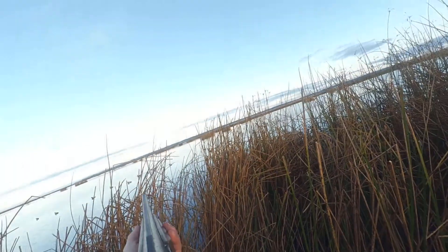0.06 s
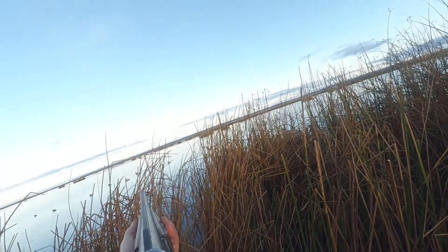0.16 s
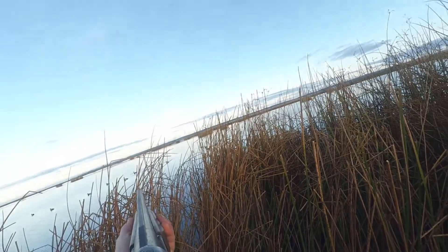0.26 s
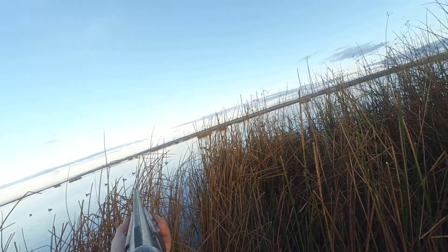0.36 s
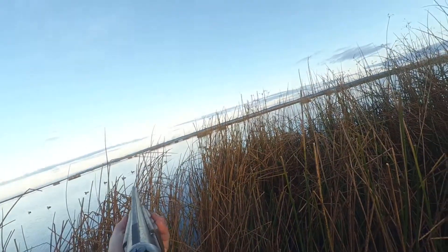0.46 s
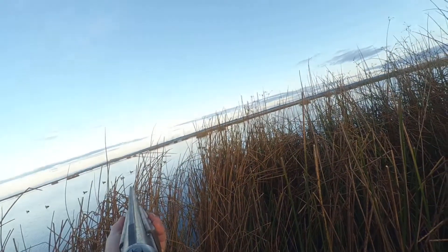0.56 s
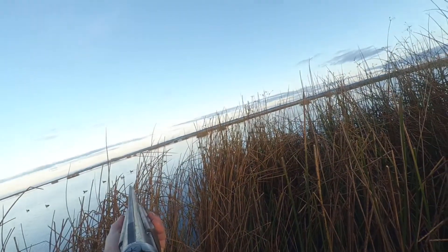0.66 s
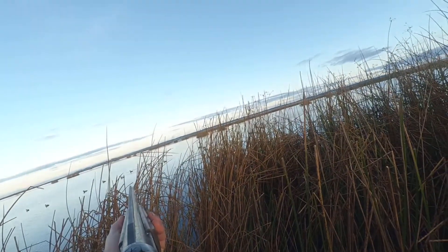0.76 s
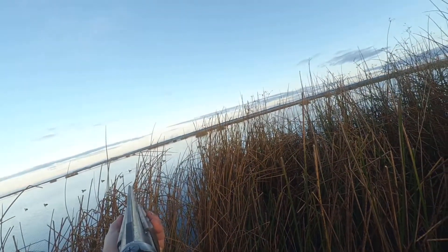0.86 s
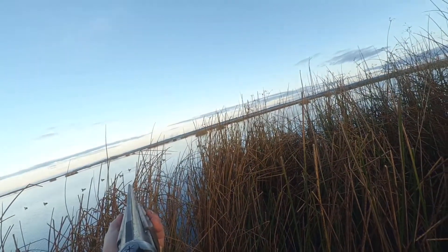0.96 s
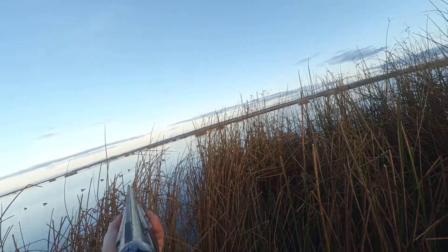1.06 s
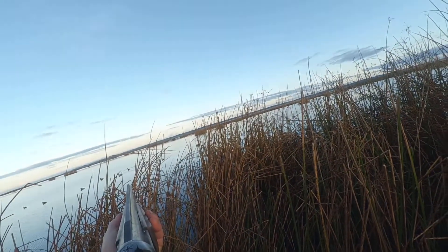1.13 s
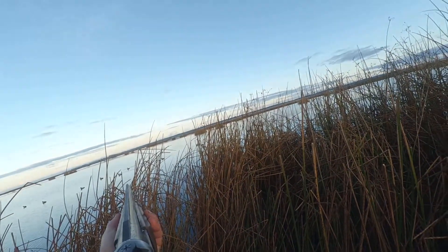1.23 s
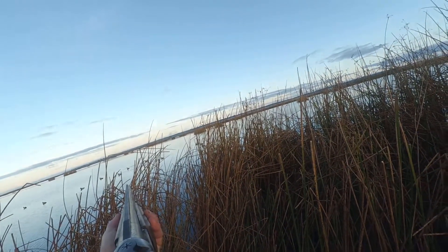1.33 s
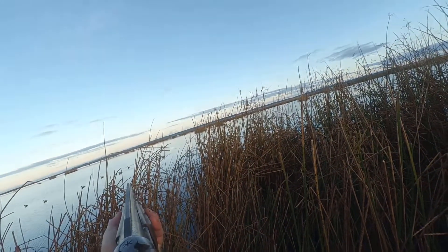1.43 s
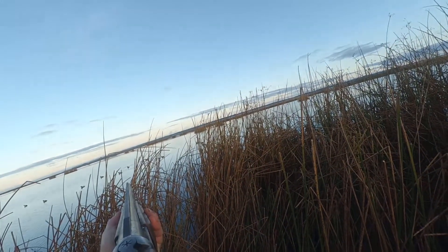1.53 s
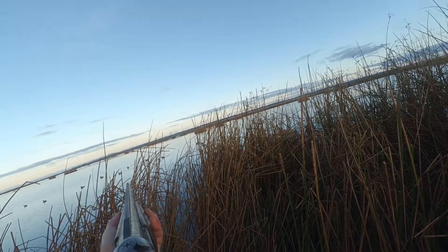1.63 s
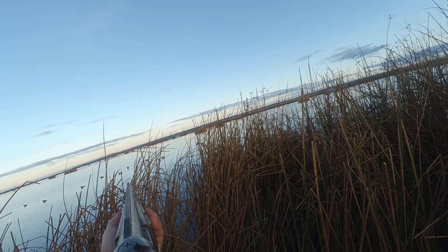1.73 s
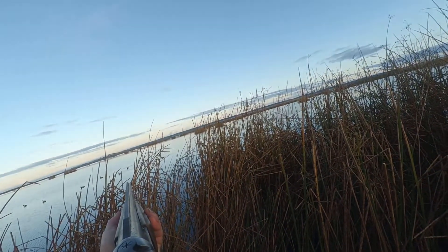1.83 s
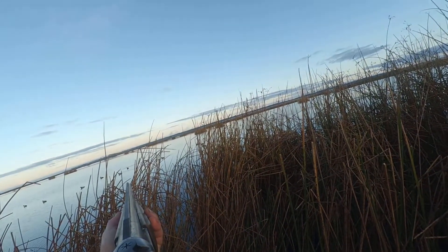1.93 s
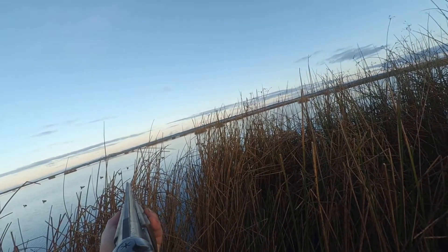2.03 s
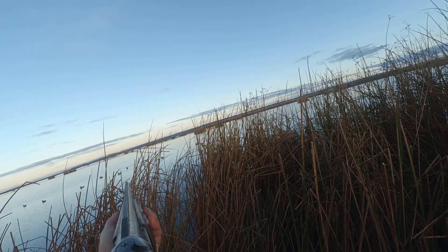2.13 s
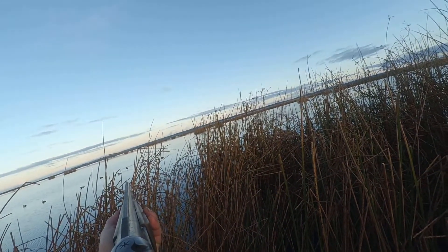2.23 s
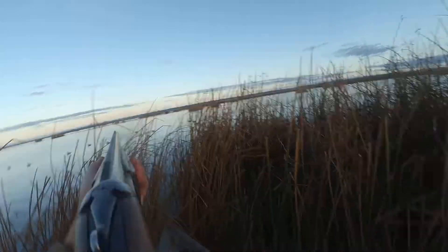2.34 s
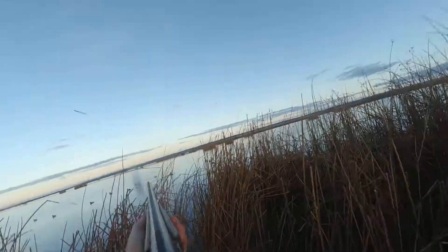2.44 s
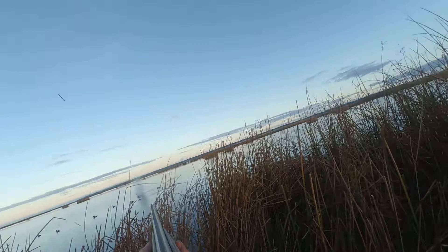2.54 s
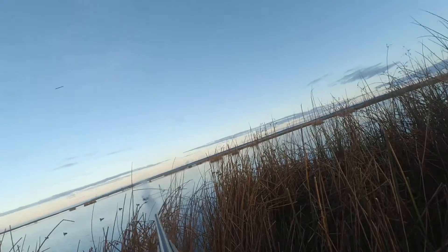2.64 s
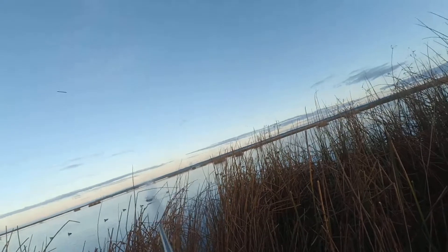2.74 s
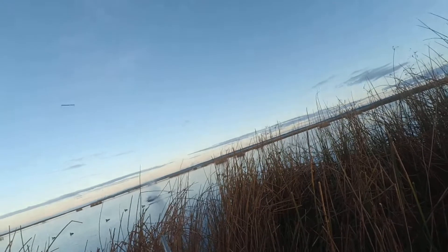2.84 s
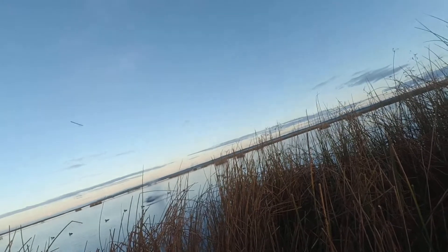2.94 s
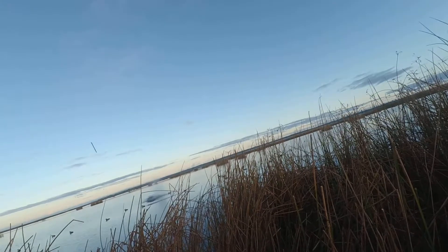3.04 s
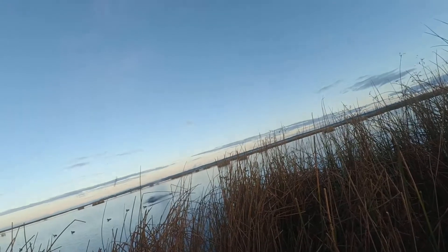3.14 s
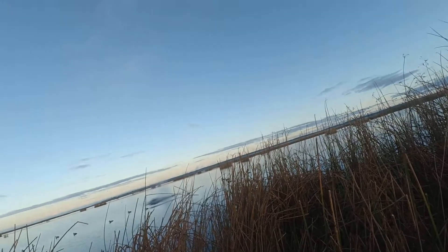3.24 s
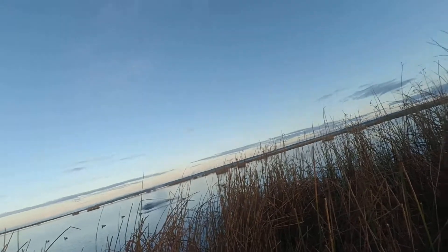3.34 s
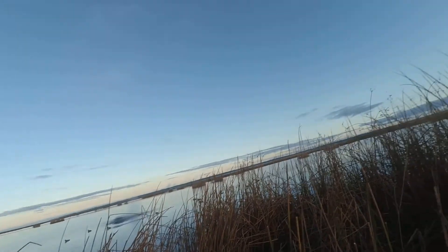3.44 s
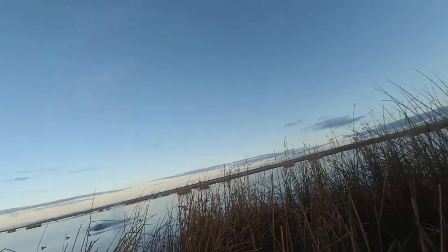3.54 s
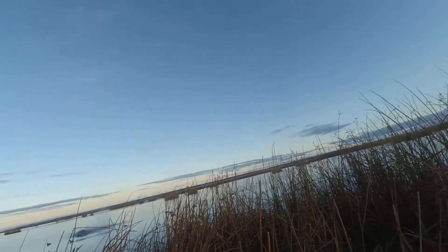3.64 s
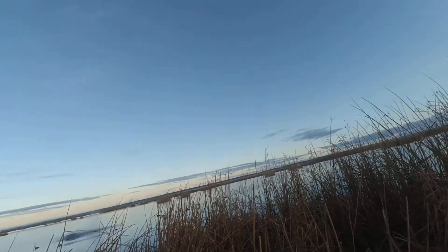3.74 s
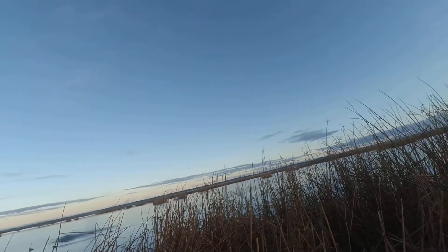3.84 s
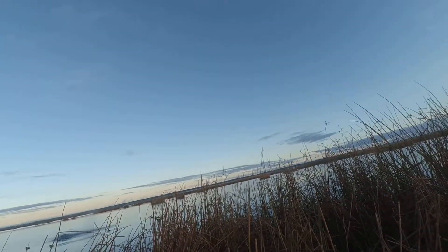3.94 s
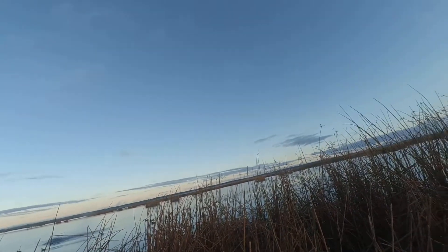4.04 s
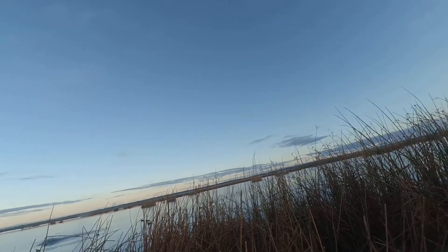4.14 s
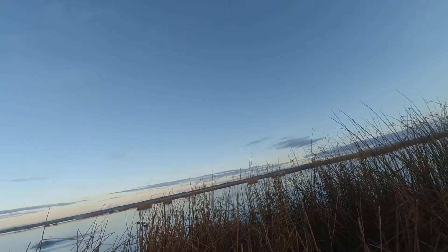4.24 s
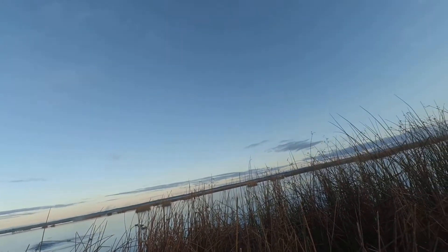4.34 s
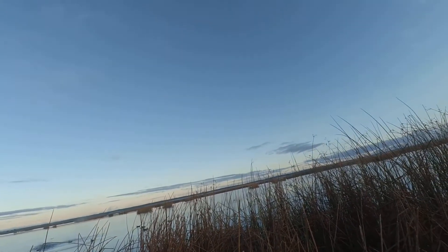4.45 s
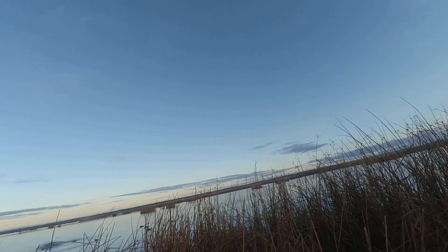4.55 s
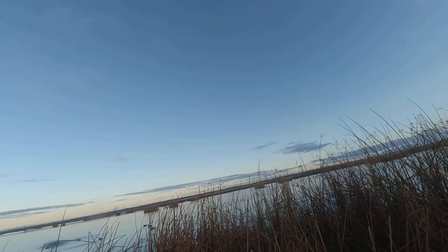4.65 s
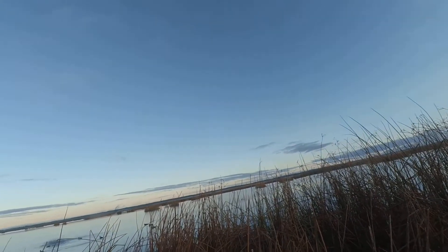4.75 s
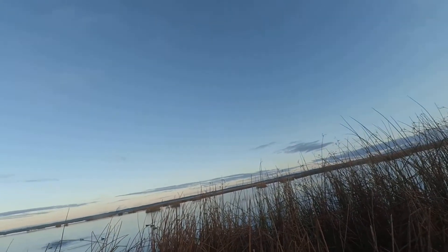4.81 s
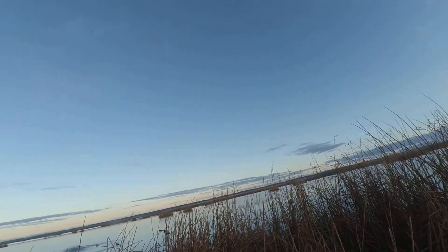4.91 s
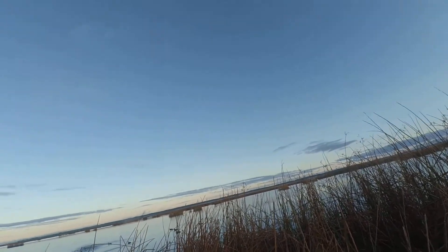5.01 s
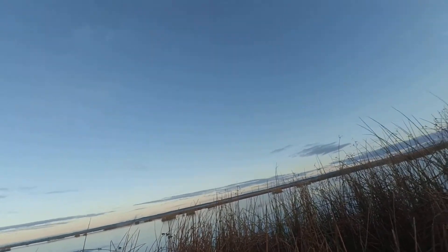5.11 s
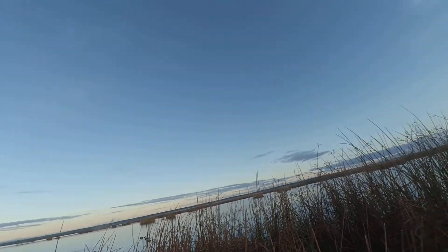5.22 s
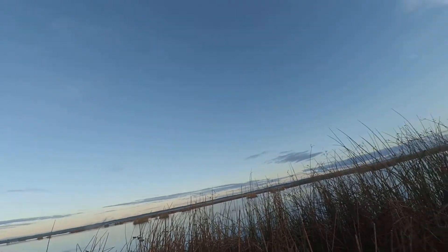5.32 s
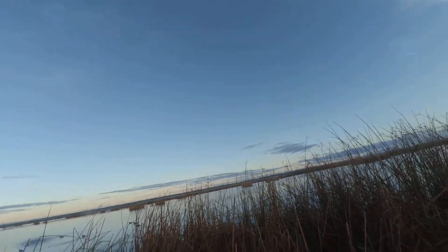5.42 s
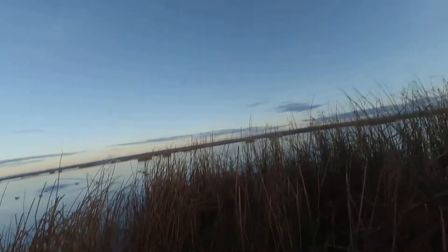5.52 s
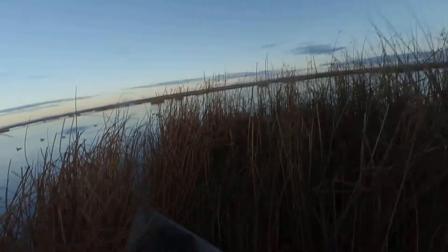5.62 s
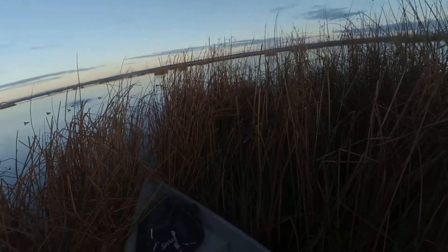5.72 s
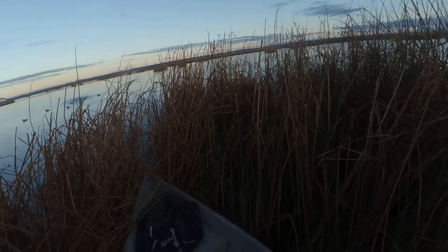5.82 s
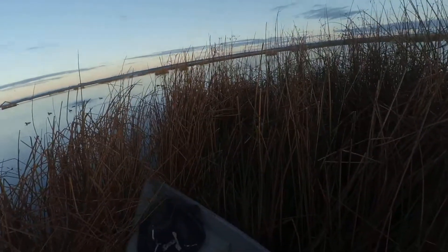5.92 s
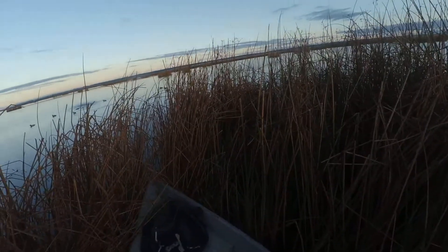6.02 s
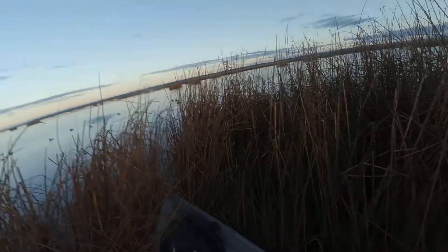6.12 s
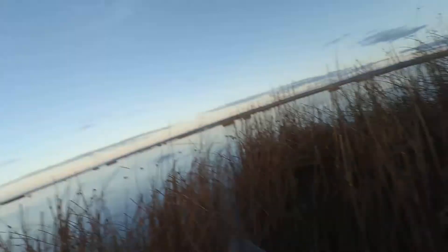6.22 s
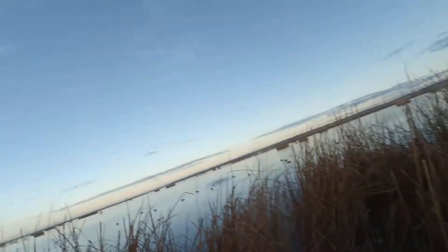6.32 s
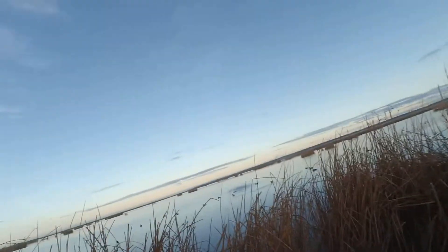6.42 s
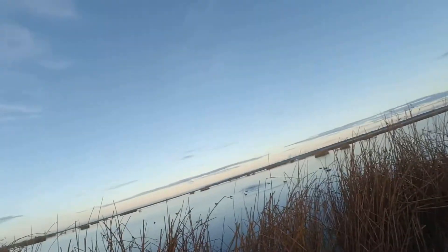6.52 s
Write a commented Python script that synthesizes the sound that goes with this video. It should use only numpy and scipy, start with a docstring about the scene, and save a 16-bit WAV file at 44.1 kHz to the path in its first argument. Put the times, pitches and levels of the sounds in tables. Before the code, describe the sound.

Light wind in a reed bed, then a single distorted shotgun shot with a fading echo, small clicks and dry snaps.

```python
"""A self-loading shotgun in a reed bed, heard at a head-worn camera.
First a far steady rush, light wind on the microphone, a rustle and a few dry snaps. At 2.06 s the gun
fires once and overloads the microphone; the bolt slams back and forward, the spent shell lands.
The marsh echoes until about 4.2 s while falling bits tick on the stems. Small steel clicks, snaps,
rustles and bumps on the camera go on to the end."""
import sys
import numpy as np
from scipy import signal
from scipy.fft import rfft, irfft, next_fast_len
from scipy.io import wavfile
from scipy.ndimage import map_coordinates

SR = 44100
rng = np.random.default_rng(int(sys.argv[2]) if len(sys.argv) > 2 else 0)


def wav_out(sig):
    """Save sig, one row per channel (or a flat mono array), as 16-bit PCM at SR to the path in sys.argv[1]."""
    wavfile.write(sys.argv[1], SR, np.round(np.clip(np.atleast_2d(sig).T, -1, 1) * 32767).astype(np.int16))


N = 289869

# noise spectra: (frequency [Hz], relative density [dB])
FAR_SPECTRUM = [(53, -33), (90, -4), (130, -3), (161, -5), (222, -7), (334, -12), (371, -12.5),
                (513, -15.5), (822, -9.5), (1020, -12), (2210, -39), (3950, -38), (6470, -40),
                (13400, -44.5), (15300, -44.5)]  # far rush and microphone hiss
WIND_SPECTRUM = [(4.7, -29), (8.0, 6), (54, 2.5), (62, 0.5), (81, -10), (120, -14.5), (160, -42),
                 (260, -120)]
STEM_SPECTRUM = [(880, -30), (1500, 5.5), (2530, -2.5), (2740, -3.5), (5000, 4.5), (5460, -6), (8450, -3.5),
                 (15300, -40)]
SHELL_SPECTRUM = [(210, -39.5), (350, -16), (488, -0.5), (599, -10), (1040, -3), (1730, -9), (1990, 1),
                  (2600, -21), (2820, -14), (6210, -9.5), (15300, -36)]
ECHO_BODY_SPECTRUM = [(180, -17.5), (300, 0.5), (393, -6.5), (492, -3), (1010, 1), (1120, -2),
                      (4290, -13.5), (5000, -22.5), (6500, -46.5), (11000, -120)]
ECHO_HISS_SPECTRUM = [(2350, -37), (4000, -3.5), (5010, -7), (7710, -5), (10400, -15), (13500, -17),
                      (15300, -30.5)]
BLAST_SPECTRUM = [(180, -34), (300, -3.5), (1300, -13), (2090, -8.5), (3590, -7.5), (4100, -7.5),
                  (5160, -7), (5420, -9), (7410, -4), (11500, -12.5), (15300, -20.5)]  # gas and pellets
# resonances: (frequency [Hz], width [Hz], gain [dB])
FITTING_MODES = [(1700, 320, 0), (2840, 68, 0), (3800, 160, -16), (5000, 180, -8), (5580, 440, 0),
                 (7700, 270, 11), (13400, 460, 6)]  # small steel parts
STEEL_MODES = [(2120, 730, -2), (3715, 810, 1.5), (4340, 440, 2), (5600, 1000, -7), (7610, 1100, -7),
               (11660, 3000, -24)]  # receiver and bolt
CLANK_MODES = [(590, 350, 0.5), (1450, 250, -2.5)]  # stock and barrel
# click bands, low to high: (frequency [Hz], width [Hz])
CLICK_BANDS = [(1300, 1400), (2600, 2220), (4700, 3400), (7600, 3100), (12500, 3900)]
# wind on the microphone: (time [s], level [dB])
WIND_LEVELS = [(0, -51), (1.7, -50.5), (1.9, -49), (2.6, -51), (4.6, -51), (5.3, -50), (6.1, -49.5),
               (6.57, -53.5)]
# spans between rise and fall: (start [s], end [s], level [dB])
RUSTLE_SPANS = [(0.937, 1.12, -74.5), (3.39, 3.465, -73), (3.61, 3.696, -64), (3.78, 3.94, -77),
                (5.151, 5.25, -77.5), (5.924, 6.063, -74.5), (6.226, 6.32, -65)]
PATTER_SPAN = (3.2, 3.36, -73)
SHELL_SPAN = (2.436, 2.458, -39)
# stems and gear: (time [s], peak [dB], centre [octaves over 1 kHz], breadth [octaves])
DRY_SNAPS = [(1.0135, -50, 3.1, .6), (1.063, -39.5, 2.8, 0.44), (1.0826, -26, 1.03, 0.66),
             (1.3753, -36.5, 1.5, 1.1), (2.3929, -35, .3, .4), (2.6023, -46.5, 1.15, 1.4),
             (3.305, -50, 3.17, 0.51), (3.539, -49.5, 3.1, 0.68), (3.5995, -47, 1.97, 0.49),
             (3.6306, -45, 1.6, 0.51), (3.6712, -41, 2.1, 0.85), (5.3238, -53.5, 2.32, 0.47),
             (5.359, -43, 0.34, 0.56), (5.423, -52, 2.2, 1.66), (5.4346, -47, 2.4, 1.24),
             (5.4378, -35.5, 2.3, 1.3), (5.4775, -40.5, 0.77, 1.3), (6.3168, -22, 2.44, .7)]
# steel parts: (time [s], peak [dB], centre [octaves over 1 kHz], breadth [octaves],
# low body [dB], rebound [dB])
STEEL_CLICKS = [(2.5022, -37.5, 1.26, 0.92, -12, 2), (3.0659, -37.5, 1.37, .9, -20, -9.5),
                (3.2016, -37, 1.6, 0.94, -1, -5), (3.692, -43, 1.94, 0.92, -4, -8),
                (4.3363, -27, 3.42, 1.35, -13, -13), (4.4632, -36, 2.23, 0.89, 2.5, 2),
                (4.4978, -28, 2.41, .8, -4, 0), (4.5681, -21, 2.06, 0.8, -10.5, -11.5),
                (5.38, -39.5, 2.28, 1.1, -3, -8), (6.2062, -34.5, 2.26, 1.1, -8, -5.5),
                (6.222, -37, 2.07, 0.95, -13, -9.5), (6.2983, -46, 1.6, .7, -15, -8)]
# bumps on the camera: (time [s], level [dB], pitch [Hz], t60 [s])
CAMERA_BUMPS = [(2.083, 4.5, 253, 0.056), (2.092, 0.5, 31, 0.064), (2.103, 0, 84, 0.025),
                (2.111, -2.5, 131, 0.054), (2.137, -2.5, 160, 0.037), (2.16, 7, 172, .035),
                (2.186, -6.5, 160, 0.045), (2.19, -12.5, 7.4, 0.31), (2.24, -22.5, 142, .1),
                (2.975, -38, 155, 0.085), (3.057, -37, 153, 0.072), (3.2022, -27, 586, 0.046),
                (3.204, -33.5, 327, .03), (3.724, -31, 160, 0.031), (5.33, -21.5, 11.2, 0.21),
                (5.354, -25.5, 145, 0.07), (5.3587, -23, 440, 0.012), (5.438, -29.5, 310, .012),
                (5.443, -30.5, 78, 0.082), (5.958, -33, 133, 0.043), (6.074, -18, 10.8, 0.18),
                (6.316, -41, 1310, 0.058)]
# bolt travel: (time [s], relative level [dB], share of clank [0-1])
BOLT_CONTACTS = [(2.1427, 1, 0.78), (2.1538, .5, 0.27), (2.158, -1.5, .6), (2.163, 6, 0.2), (2.171, 3, .4),
                 (2.177, -2, 0.43), (2.190, -6, .2), (2.197, -18, .4), (2.208, -19, .3), (2.2406, -39, .8),
                 (2.279, -28.5, 0), (2.284, -25.5, .1)]

SHOT_S = 2.0586
ECHO_S, ECHO_END_S = 2.3, 4.15


def amp(db):
    """Decibels to gain."""
    return 10 ** (np.asarray(db) / 20)


def unit(x):
    """Scaled to rms 1."""
    return x / np.sqrt(np.mean(x ** 2) + 1e-20)


def filtered(x, response):
    """x times a complex response of frequency."""
    m = next_fast_len(len(x) + 4096)
    return irfft(rfft(x, m) * response(np.fft.rfftfreq(m, 1 / SR)), m)[:len(x)]


def noise(spectrum):
    """Noise of rms 1 coloured by (Hz, dB) points on a log axis."""
    f, db = np.transpose(spectrum)
    white = rng.standard_normal(N)
    return unit(filtered(white, lambda hz: amp(np.interp(np.log(hz + 1), np.log(f + 1), db))))


def resonant(x, modes):
    """x through parallel resonances of alternating sign."""
    return filtered(x, lambda f: sum(
        (-1) ** k * amp(db) * 1j * f * width_hz / (hz * hz - f * f + 1j * f * width_hz)
        for k, (hz, width_hz, db) in enumerate(modes)))


def level(rows):
    """Gain per sample from (s, dB) rows."""
    s, db = np.transpose(rows)
    return amp(np.interp(np.arange(N) / SR, s, db))


def dying(start_s, t60_s, rise_s):
    """Envelope: quick rise, exponential decay."""
    t = np.clip(np.arange(N) / SR - start_s, 0, None)
    return amp(-60 * t / t60_s) * (1 - np.exp(-t / rise_s))


def held(start_s, end_s, db, rise_db_s, fall_db_s, sag_db_s=0):
    """Envelope: climbs until start_s, sags until end_s, then drops."""
    t = np.arange(N) / SR
    rise_db = rise_db_s * np.clip(start_s - t, 0, None)
    sag_db = sag_db_s * np.clip(t - start_s, 0, end_s - start_s)
    fall_db = fall_db_s * np.clip(t - end_s, 0, None)
    return amp(db - rise_db - sag_db - fall_db)


def wobble(rate_hz):
    """Smooth curve through random knots."""
    knots = rng.standard_normal(int(N * rate_hz / SR) + 4)
    return map_coordinates(knots, [np.arange(N) * rate_hz / SR])


def add(track, s, sound):
    """Lays a short sound on the track."""
    part = track[round(s * SR):][:len(sound)]
    part += sound[:len(part)]


def air():
    """Steady far rush under lumpy wind on the microphone, stirred up by the blast."""
    far = amp(-56.5 + 0.34 * wobble(5.5)) * noise(FAR_SPECTRUM)
    wind_gain = level(WIND_LEVELS) + amp(-34) * dying(SHOT_S + .04, t60_s=.9, rise_s=.05)
    return far + wind_gain * amp(3.3 * wobble(15)) * noise(WIND_SPECTRUM)


def rustle():
    """Dry stems and cloth rub in small crackling grains."""
    grains = amp(3.5 * wobble(250) + 2.5 * wobble(35))
    envelope = sum(held(*span, rise_db_s=170, fall_db_s=280) for span in RUSTLE_SPANS)
    return envelope * unit(grains * noise(STEM_SPECTRUM))


def patter(hits_per_s=70, t60_s=0.0057):
    """Falling bits tick on the stems at random."""
    hits = (rng.random(N) < hits_per_s / SR) * amp(4 * rng.standard_normal(N))
    puffs = signal.lfilter([1], [1, -amp(-60 / (t60_s * SR))], hits) * rng.standard_normal(N)
    modes = [(8034, 3500, 0), (3500, 2300, -5)]
    ticks = unit(resonant(resonant(puffs, modes), modes))
    return held(*PATTER_SPAN, rise_db_s=22, fall_db_s=22) * ticks


def click(envelope, db, centre_oct, breadth_oct, body_db, impulse, ring_db):
    """One contact: a burst over broad resonances, with some ring of the steel parts."""
    sound = np.zeros(len(envelope))
    for hz, width_hz in CLICK_BANDS:
        burst = envelope * rng.standard_normal(len(envelope))
        burst[0] += impulse  # clean first touch
        band = resonant(burst, [(hz, width_hz, 0)])
        band = resonant(band, [(hz, 0.75 * width_hz, 0)])  # steeper skirts
        share = amp(-6 * ((np.log2(hz / 1000) - centre_oct) / breadth_oct) ** 2)
        body = amp(body_db) * (hz == CLICK_BANDS[0][0])
        sound += (share + body) * band / np.abs(band).max()
    sound += amp(ring_db) * resonant(sound, FITTING_MODES)
    return amp(db) * sound / np.abs(sound).max()


def snaps_and_clicks(snap_t60_s=.0045, click_t60_s=.007, rebound_t60_s=.015, scatter_t60_s=.067):
    """Dry snaps die at once; steel clicks rebound; both scatter briefly in the reeds."""
    out, t = np.zeros(N), np.arange(SR // 10) / SR
    scatter = amp(-60 * t / scatter_t60_s)
    rebound = amp(-60 * t / rebound_t60_s) * np.clip(t / 0.0011, 0, 1)
    rebound = np.roll(rebound, round(0.0064 * SR))
    for s, db, centre_oct, breadth_oct in DRY_SNAPS:
        envelope = amp(-60 * t / snap_t60_s) + amp(-23.5) * scatter
        add(out, s, click(envelope, db, centre_oct, breadth_oct, body_db=-15.5, impulse=5.5, ring_db=-12))
    for s, db, centre_oct, breadth_oct, body_db, rebound_db in STEEL_CLICKS:
        envelope = amp(-60 * t / click_t60_s) + amp(rebound_db) * (rebound + amp(1) * scatter)
        add(out, s, click(envelope, db, centre_oct, breadth_oct, body_db, impulse=3.2, ring_db=-2))
    return out


def bumps(knock_db=-8, knock_t60_s=0.011):
    """Bumps reach the camera through the body: a damped swing with a rough knock above it."""
    out, t = np.zeros(N), np.arange(SR // 3) / SR
    for s, db, hz, t60_s in CAMERA_BUMPS:
        swing = amp(-60 * t / t60_s) * (1 - np.exp(-t * hz * 4)) * np.sin(2 * np.pi * hz * t)
        burst = amp(-60 * t / knock_t60_s) * rng.standard_normal(len(t))
        modes = [(2.2 * hz, 2 * hz, 0)]
        knock = resonant(resonant(burst, modes), modes)
        knock *= amp(knock_db) * np.abs(swing).max() / np.abs(knock).max()
        add(out, s, amp(db) * (swing + knock))
    return out


def shell():
    """The spent shell lands with a short splash."""
    envelope = held(*SHELL_SPAN, rise_db_s=1240, fall_db_s=2900, sag_db_s=170)
    return envelope * amp(2.0 * wobble(180)) * noise(SHELL_SPECTRUM)


def echo():
    """The nearest reeds ring back around 2 kHz; water and the far shore answer for two seconds."""
    reed_spectrum = [(900, -28.5), (1800, -2.5), (2300, 1.5), (2900, -9.0), (6000, -23), (12000, -37.5)]
    reeds = amp(-31.5) * dying(2.19, t60_s=0.38, rise_s=.01) * noise(reed_spectrum)
    body = held(ECHO_S + 0.16, ECHO_END_S, db=-51.5, rise_db_s=30, fall_db_s=54.7, sag_db_s=14.8)
    body *= amp(0.9 * wobble(15)) * noise(ECHO_BODY_SPECTRUM)
    hiss = held(ECHO_S, ECHO_END_S, db=-63.5, rise_db_s=15, fall_db_s=50, sag_db_s=11.6)
    hiss *= amp(1.5 * wobble(52) + 2.4 * wobble(300) + 0.9 * wobble(8)) * noise(ECHO_HISS_SPECTRUM)
    arrived = np.arange(N) / SR > SHOT_S + .1
    return reeds + arrived * (body + hiss)


def bolt():
    """Each contact shakes the steel and, by its share, the lower clank of stock and barrel."""
    steel = unit(resonant(rng.standard_normal(N), STEEL_MODES) + amp(-24.5) * noise(BLAST_SPECTRUM))
    clank = unit(resonant(rng.standard_normal(N), CLANK_MODES))
    out = np.zeros(N)
    for s, db, share in BOLT_CONTACTS:
        ring = np.sqrt(1 - share) * steel + np.sqrt(share) * clank
        out += amp(db - 5.0) * dying(s, t60_s=0.038, rise_s=.0004) * ring
    return out


def shot():
    """Hammer tick, the gas column ringing upward as the barrel empties, then crack and roar of the gas."""
    t = np.clip(np.arange(N) / SR - SHOT_S, 0, .05)
    hammer = amp(-20.5) * dying(SHOT_S - .0018, t60_s=0.0097, rise_s=.0004) * noise(BLAST_SPECTRUM)
    phase_rad = 2 * np.pi * (600 * t + 15000 * t ** 2) + 2.0 + 0.68 * wobble(1500)
    barrel = amp(20.0) * dying(SHOT_S, t60_s=0.031, rise_s=0.00089) * np.sin(phase_rad)
    crack = amp(-4.0) * dying(SHOT_S, t60_s=0.058, rise_s=.0005) * noise(BLAST_SPECTRUM)
    roar = amp(10.5) * dying(SHOT_S + 0.0038, t60_s=0.14, rise_s=0.0012) * noise(BLAST_SPECTRUM)
    return hammer + barrel + crack + roar


def scene():
    """All sources at one microphone."""
    gun = shot() + bolt()
    small_sounds = bumps() + snaps_and_clicks() + rustle() + patter() + shell()
    return (gun + small_sounds + echo() + air())[None]


def record(dry):
    """The input stage clips hard; a steep low-pass follows."""
    ceiling, cutoff_hz = .97, 15430
    clipped = dry[0] / (1 + np.abs(dry[0] / ceiling) ** 8) ** (1 / 8)
    return filtered(clipped, lambda hz: 1 / (1 + np.exp(np.clip((hz - cutoff_hz) / 60, -50, 50))))[None]


dry = scene()
out = record(dry)
wav_out(out)
```